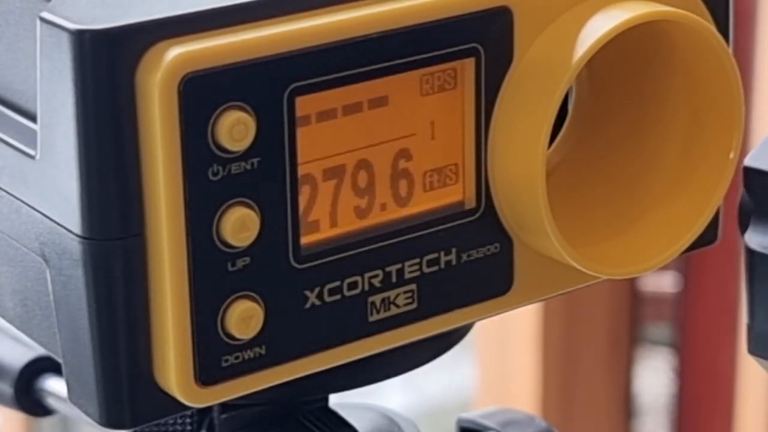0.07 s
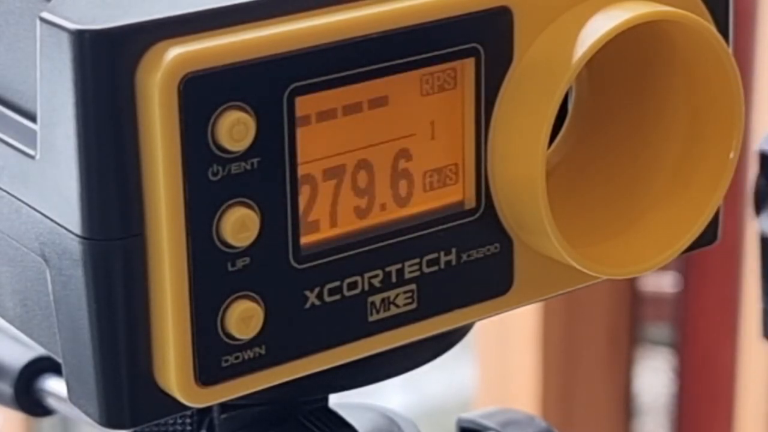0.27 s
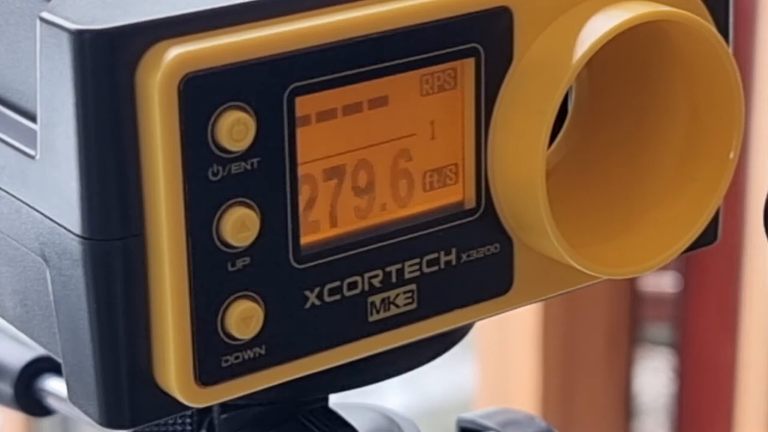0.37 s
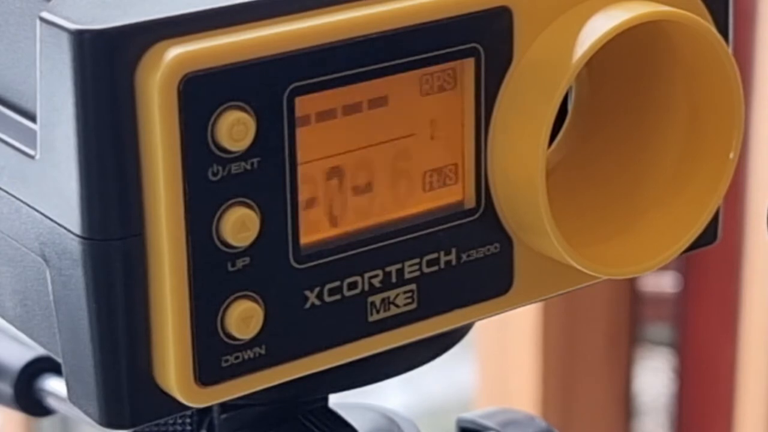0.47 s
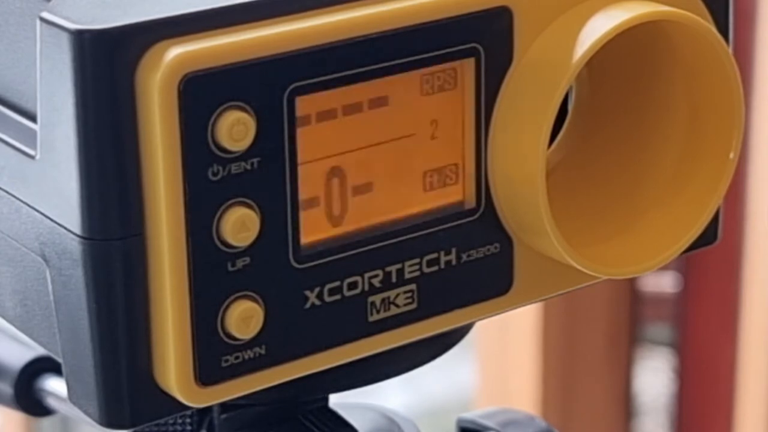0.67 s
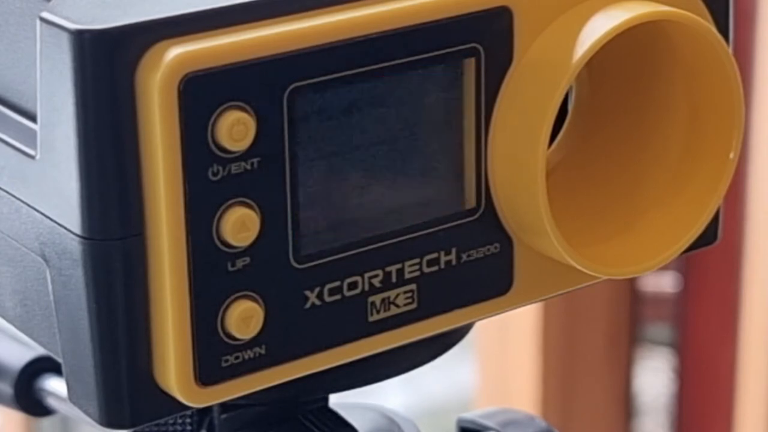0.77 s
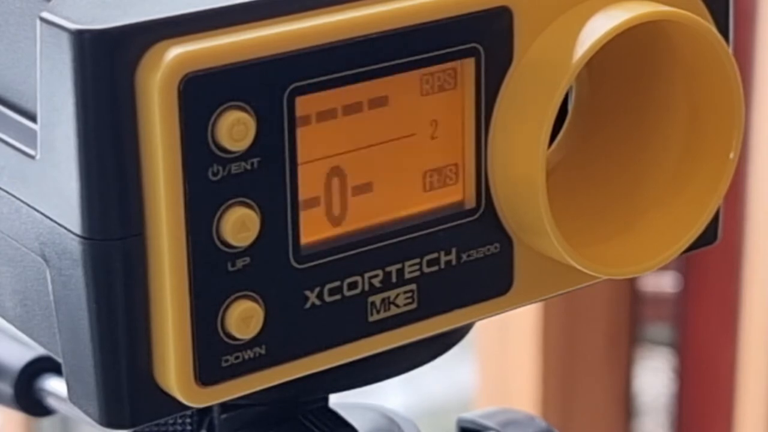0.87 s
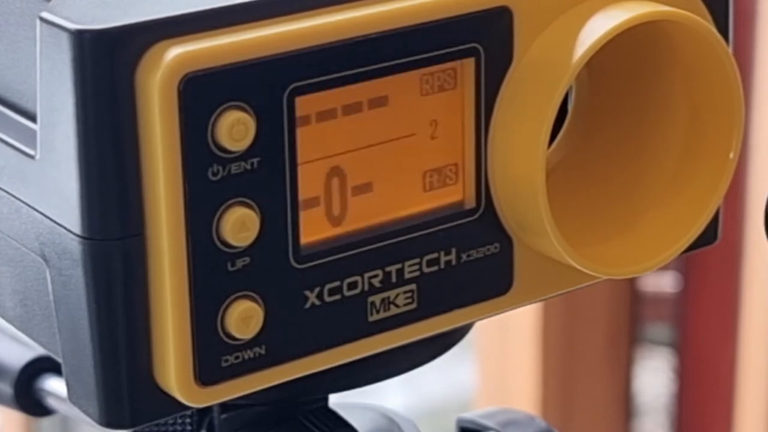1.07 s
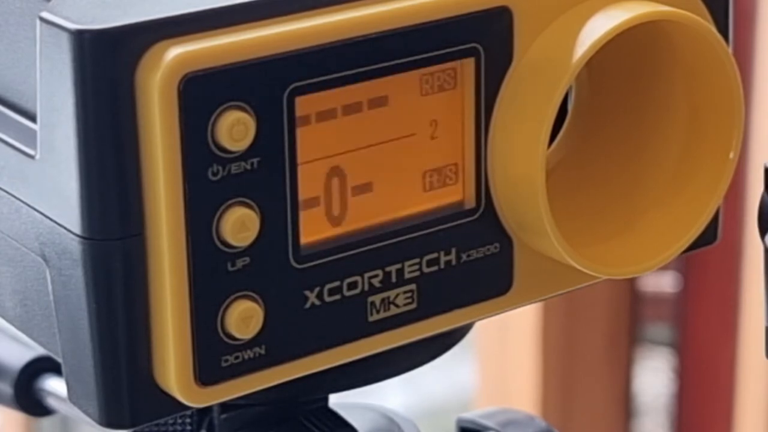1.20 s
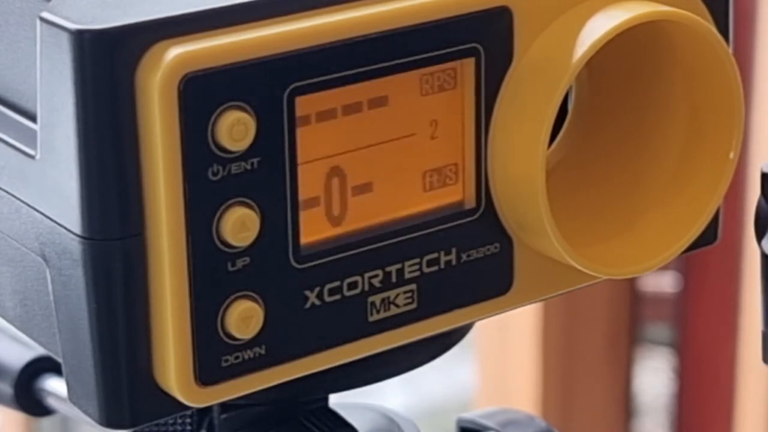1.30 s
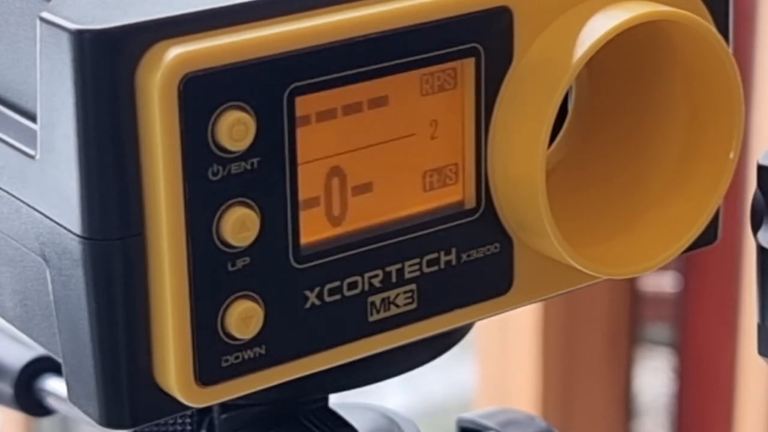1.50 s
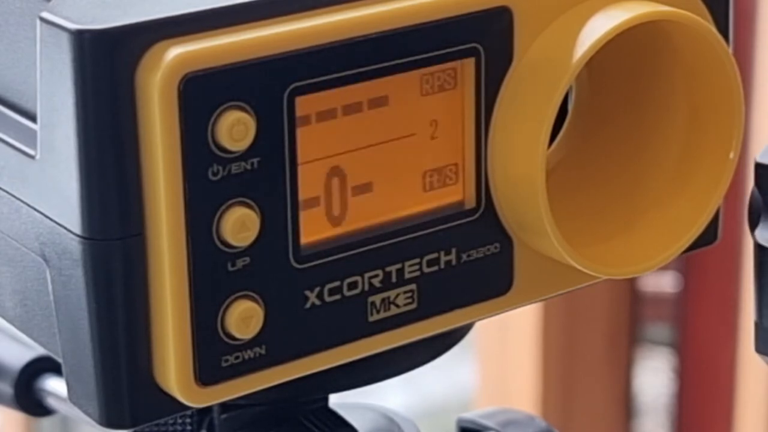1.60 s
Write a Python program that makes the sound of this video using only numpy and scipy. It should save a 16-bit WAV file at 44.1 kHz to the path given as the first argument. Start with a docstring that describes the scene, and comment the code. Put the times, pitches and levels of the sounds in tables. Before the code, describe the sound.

A gas airsoft pistol fires once at about 0.2 seconds, after soft room tone: a sharp, hissing crack with a low thump. The close microphone overloads and chokes for a tenth of a second, passing just two tiny slide knocks. The room's echo returns, and near 0.4 seconds the slide snaps shut more quietly. Very faint ticks follow around 0.5 and 0.8 seconds, leaving only room tone.

```python
"""Indoors, a gas airsoft pistol fired once, right beside the microphone.
Soft room tone comes first. At 0.21 s gas bursts from the muzzle, hissing and ringing the barrel, and
its pressure pins the microphone for a tenth of a second: only a dull leak and the tips of two slide
knocks get through. The microphone comes free with a low thump, the room's ring is back, and at 0.38 s
the slide snaps shut. Trigger and grip tick faintly as the ring dies into the room tone."""
import sys
import numpy as np
from scipy import signal
from scipy.fft import rfft, irfft
from scipy.io import wavfile

SR = 44100
rng = np.random.default_rng(int(sys.argv[2]) if len(sys.argv) > 2 else 0)


def file_out(sig):
    """Save sig as 16-bit WAV at sys.argv[1]."""
    # one column per channel
    cols = np.atleast_2d(sig).T
    # limit, then scale
    lim = np.clip(cols, -1, 1)
    pcm = np.round(lim * 32767).astype(np.int16)
    wavfile.write(sys.argv[1], SR, pcm)


N = 72765


def amp(db):
    """Decibels to gain."""
    return 10 ** (np.asarray(db) / 20)


def since(start):
    """Seconds since a moment, zero before it."""
    return np.maximum(np.arange(N) / SR - start, 0)


def curve(rows):
    """Straight lines through (t/s, value) points."""
    return np.interp(np.arange(N) / SR, *np.array(rows).T)


def burst(start, rise, decay):
    """Envelope that swells up to a moment and dies away."""
    t = np.arange(N) / SR - start
    return np.exp(np.where(t < 0, t / max(rise, 1e-5), -t / max(decay, 1e-5)))


def fade(start, t60):
    """Envelope that opens at a moment and falls 60 dB in t60 seconds."""
    return (since(start) > 0) * np.exp(-np.log(1000) * since(start) / t60)


def spectrum(freqs, values):
    """Values spread over the FFT bins along a log-frequency axis."""
    hz = np.arange(N // 2 + 1) * SR / N
    return np.interp(np.log(hz + 1e-9), np.log(freqs), values)


def noise(colour):
    """Noise of rms 1, coloured by (f/Hz, level/dB) points."""
    gains = amp(spectrum(*np.array(colour).T))
    x = irfft(rfft(rng.standard_normal(N)) * gains, N)
    return x / x.std()


def ring(modes, start):
    """Damped modes (f/Hz, level/dB, t60/s) struck at one moment."""
    t = since(start)
    return sum(amp(db) * np.sin(2 * np.pi * hz * t) * fade(start, t60) for hz, db, t60 in modes)


def butter(x, hz, kind, order):
    """Plain low- or high-pass."""
    return signal.sosfilt(signal.butter(order, hz, kind, fs=SR, output="sos"), x)


def near_reflections(x):
    """Surfaces close to the muzzle repeat a sound within two milliseconds."""
    # direct path and two reflections: delay/s, level/dB
    paths = [(0, 3.5), (.00070, -9.5), (.00145, -14)]
    return sum(amp(db) * np.roll(x, int(delay * SR)) for delay, db in paths)


def room_tone():
    """A soft, dull rush that wavers a little."""
    # colour of the rush: f/Hz, relative level/dB
    colour = [(15, -42.5), (25, -18), (58, 1), (117, -7), (217, -8), (270, -11), (373, -8), (439, -10),
              (796, -5), (887, -4.5), (5880, -34.5), (14000, -44.5), (16000, -52.5)]
    # the room tone dips at the shot, stays low, then comes back: t/s, level/dB
    tone_level = [(0, -51.5), (.2, -49.5), (.3, -58), (.8, -56.5), (1.1, -58.5), (1.35, -57.5),
                  (1.65, -52.5)]
    waver = butter(rng.standard_normal(N), 27, "low", order=2)
    waver_db = .86 * waver / waver.std()
    return noise(colour) * amp(curve(tone_level) + waver_db)


def muzzle_gas():
    """Close up, each burst of gas hisses and its pressure pulse rings the air in the barrel."""
    # gas bursts: t/s, hiss level/dB, rise/s, decay/s, pulse level/dB
    bursts = [(0.2148, -16, .0006, 0.0044, -37), (0.2181, 2, .001, 0.0015, 3),
              (0.2230, -8.5, 0.0012, .007, -16.5), (0.2291, 6.5, .00045, 0.00058, 7.5)]
    # colour of the hiss: f/Hz, relative level/dB
    hiss_colour = [(100, 9), (600, 2.5), (1400, -1.5), (2100, 6.5), (3100, -4), (4400, 3), (5600, -3.5),
                   (7000, -9.5), (9500, -8), (16000, -20)]
    # air modes of barrel and muzzle tube: f/Hz, relative level/dB, t60/s
    barrel_modes = [(190, -20, 0.0053), (632, -1.5, .013), (1000, 0.5, 0.017), (2070, -11.5, 0.0088),
                    (4483, -16.5, .04), (5600, -20.5, 0.043)]
    envelope = sum(amp(db) * burst(s, rise, decay) for s, db, rise, decay, _ in bursts)
    barrel = sum(amp(db) * ring(barrel_modes, s) for s, _, _, _, db in bursts)
    return envelope * noise(hiss_colour) + barrel


def room_ring(shot_s, snap_s):
    """The room answers the shot, each band dying at its own rate, and briefly echoes the snap."""
    # bands of the diffuse ring: f/Hz, relative level/dB, t60/s
    bands = [(50, 3, .45), (109, -3, 0.39), (190, 2, 0.45), (400, 1.5, .39), (910, 4, .41),
             (1800, -5.5, .41), (3000, -7, .39), (4600, -4.5, .38), (6000, -7, 0.34), (7500, -14, .34),
             (11000, -16.5, .31), (15785, -30, .28)]
    # a standing wave of the room: f/Hz, level/dB, t60/s
    standing_wave = [(388, -18, .38)]
    freqs, levels, t60s = np.array(bands).T
    colour = list(zip(freqs, levels))
    wash = rfft(noise(colour))
    diffuse = sum(irfft(wash * spectrum(freqs, band), N) * fade(shot_s, t60)
                  for band, t60 in zip(np.eye(len(bands)), t60s))
    build_up = 1 - np.exp(-since(shot_s) / .03)
    snap_echo = amp(-36) * noise(colour) * fade(snap_s, t60=.09)
    return build_up * (amp(-9) * diffuse + ring(standing_wave, shot_s)) + snap_echo


def slide_knocks():
    """The slide kicks back and hits its stop; only the upward tips pass the pinned microphone."""
    # knocks: t/s, relative level/dB, length/s, ring f/Hz
    knocks = [(0.2380, 0.5, .00005, 2513), (0.276, 1.5, 0.00013, 9870)]
    rise_s = .00004
    spikes = 0
    for s, db, length, hz in knocks:
        t = (np.arange(N) - round(s * SR)) / SR
        envelope = np.exp(-(t / np.where(t < 0, rise_s, length)) ** 2)
        tips = np.maximum(np.cos(2 * np.pi * hz * t), 0)
        spikes = spikes + amp(db) * envelope * tips
    return near_reflections(spikes)


def slide_snap(snap_s):
    """The slide snaps shut: a crack and the short ring of slide and frame."""
    # modes of slide and frame: f/Hz, relative level/dB, t60/s
    slide_modes = [(1413, -13, .007), (3370, -26.5, 0.0037), (3800, -30.5, .09), (4066, -5.5, 0.0058),
                   (4300, -35.5, .08), (5020, -11.5, 0.0037), (7570, -17.5, .006), (9578, -6.5, 0.0056),
                   (11350, -14, 0.0059), (13250, -54.5, .1)]
    crack = amp(-12) * rng.standard_normal(N) * burst(snap_s, rise=0, decay=.0021)
    return amp(-5) * near_reflections(ring(slide_modes, snap_s) + crack)


def handling_ticks():
    """Small parts tick as the trigger is let go."""
    # ticks of trigger and grip: t/s, level/dB, centre f/Hz, decay/s
    ticks = [(0.4874, -58, 7960, 0.0067), (0.5024, -60, 7000, .010), (0.7602, -63.5, 4850, 0.0044),
             (0.7832, -65, 4250, .025)]
    handling = 0
    for s, db, hz, decay in ticks:
        colour = [(hz / 2, -22), (hz, 0), (hz * 2, -20), (hz * 4, -40)]
        handling = handling + amp(db) * burst(s, .001, decay) * noise(colour)
    return handling


def scene():
    """The pistol and its room as they reach one close microphone."""
    shot_s, snap_s = .22, .3828
    pistol = muzzle_gas() + slide_snap(snap_s) + handling_ticks()
    return (pistol + room_ring(shot_s, snap_s) + room_tone())[None]


def record(dry):
    """Pushed against its stop, the microphone passes only spikes and a dull leak; its bass thumps."""
    # gas pressure on the microphone: t/s, push/full travel
    gas_pressure = [(0.2205, 0), (0.2222, .95), (0.2290, 1.05), (0.2320, 4), (0.3385, 4), (0.3425, 0)]
    # low thumps: a faint rumble of trigger and hammer before the shot, then jolts of the microphone: t/s,
    # swing/full travel, f/Hz, t60/s
    thumps = [(0.2030, .012, 100.7, .04), (0.2187, -0.45, 105.3, .028), (0.2298, -.38, 110.3, .014),
              (0.2795, .035, 54.4, 0.061), (0.3445, -0.025, 54, 0.11)]
    ceiling, leak_from_s, leak_rise_s = .88, .295, .0099
    sag_hz, bass_hz, bass_q = 89, 54.8, 1.7
    sound, push = dry[0], curve(gas_pressure)
    travel = np.clip(sound - push, -1, 1) - np.clip(-push, -1, 1)
    pinned = np.clip(push - 1, 0, 1)
    easing = np.clip(since(leak_from_s) / leak_rise_s, 0, 1)
    leak = amp(-47.5) * easing * pinned * butter(sound, 910, "low", order=2)
    y = ceiling * np.clip(travel, -1, 1) + slide_knocks() + leak
    # the bass sags, then rings in a resonant high-pass
    y = butter(y, sag_hz, "high", order=1)
    w = 2 * np.pi * bass_hz
    y = signal.lfilter(*signal.bilinear([1, 0, 0], [1, w / bass_q, w * w], SR), y)
    y = y + sum(swing * ring([(hz, 0, t60)], s) for s, swing, hz, t60 in thumps)
    # peaks clip; the treble rolls off and ends steeply at 16 kHz
    y = butter(np.clip(y, -.9, .9), 16980, "low", order=2)
    top_cut = signal.ellip(8, .2, 80, 16000, fs=SR, output="sos")
    return signal.sosfilt(top_cut, y)[None]


dry = scene()
out = record(dry)
file_out(out)
```